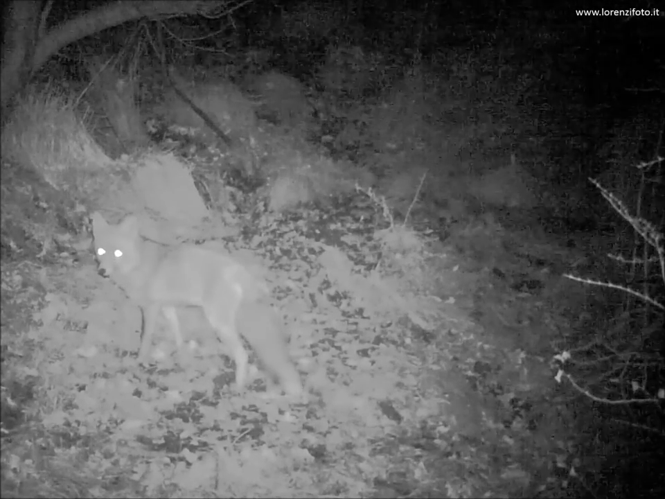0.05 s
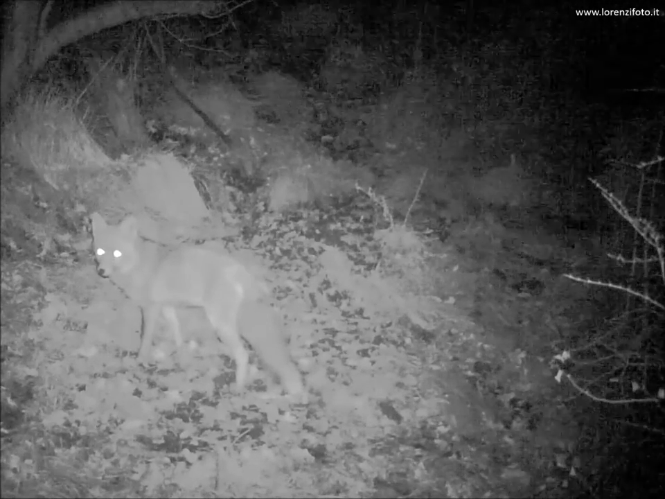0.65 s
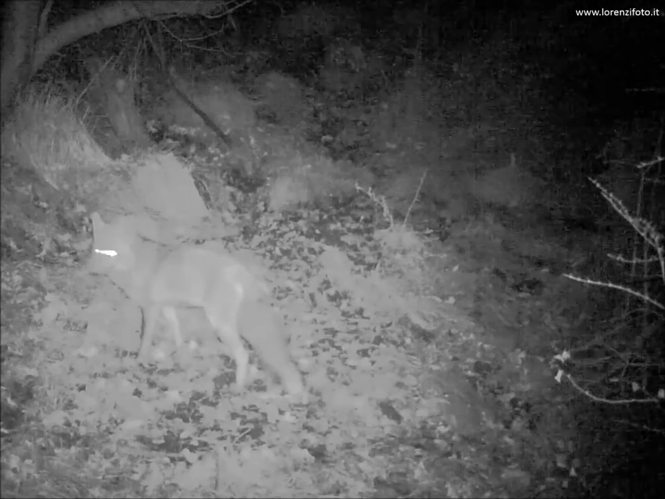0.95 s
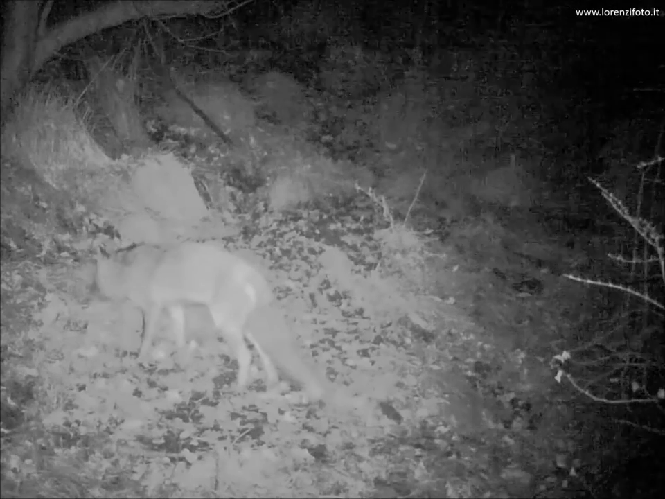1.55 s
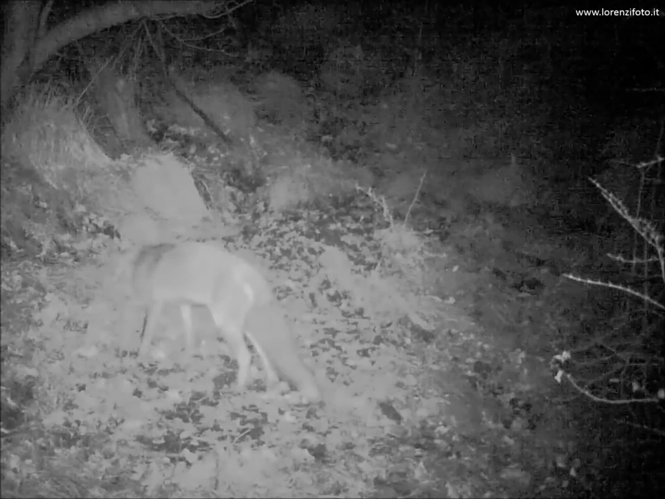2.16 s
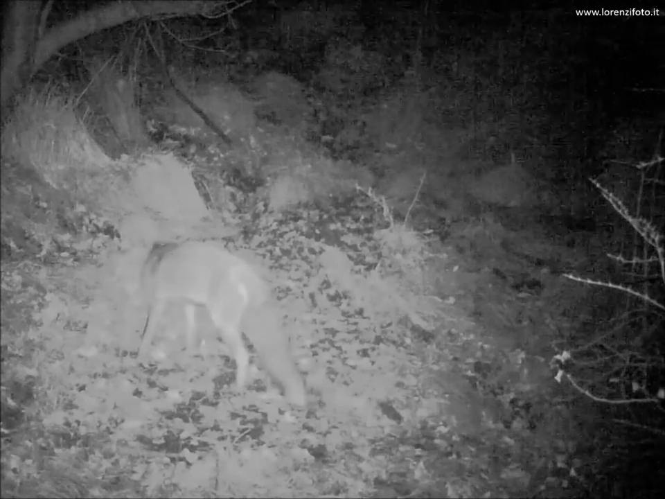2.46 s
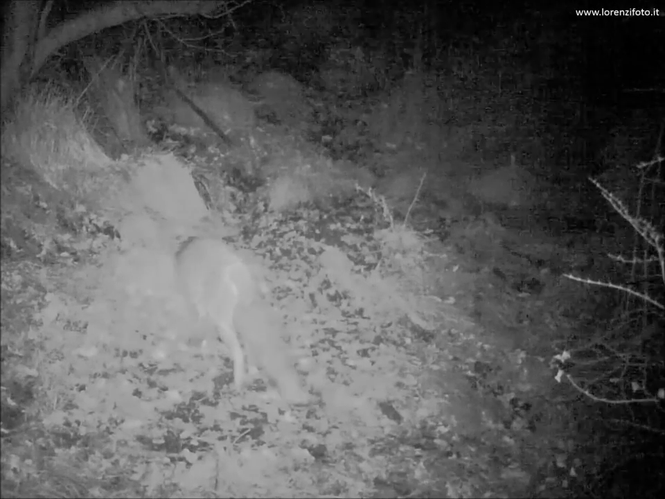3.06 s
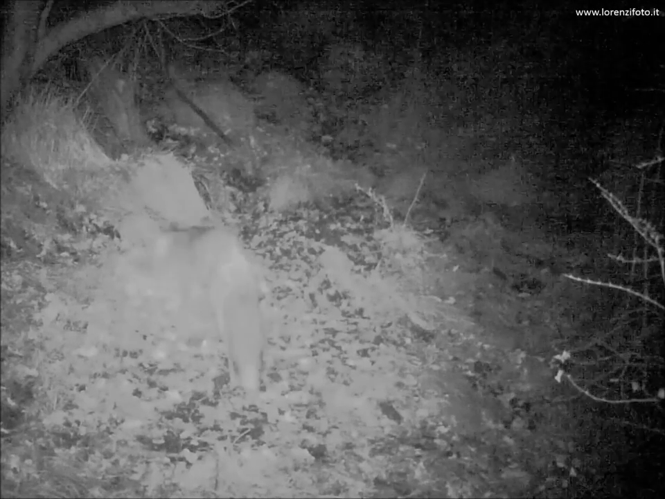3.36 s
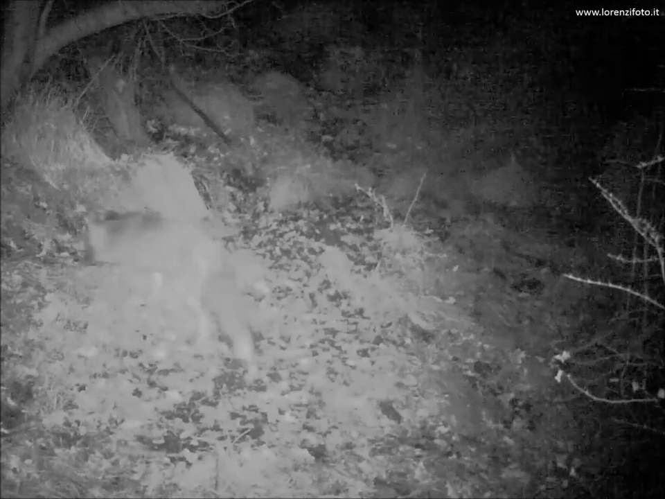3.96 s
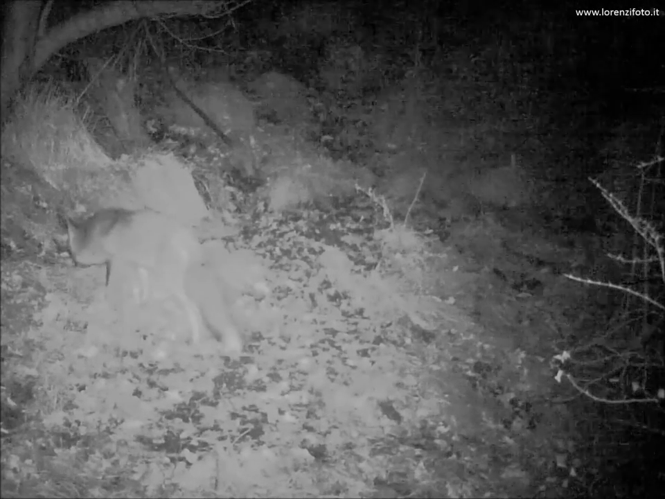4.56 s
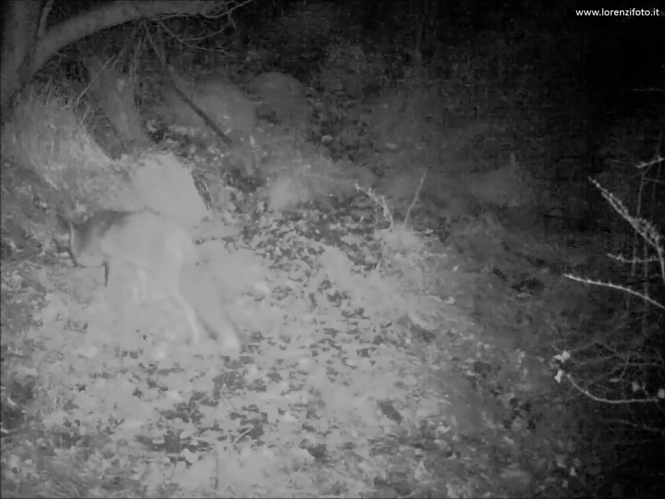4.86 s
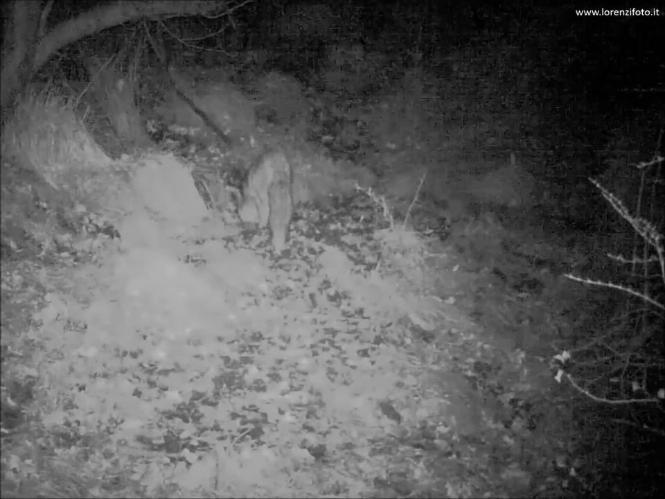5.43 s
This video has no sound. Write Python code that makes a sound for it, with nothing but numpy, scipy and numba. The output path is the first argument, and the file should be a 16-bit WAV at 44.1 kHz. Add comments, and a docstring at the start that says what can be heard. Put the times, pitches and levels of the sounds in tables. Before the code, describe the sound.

A steady, low microphone hiss fills a quiet wood at night. After about a second a fox barks once, a short, harsh call that starts thin and quickly turns rough and raspy. The trees return a soft, dull echo. A couple of seconds later a paw faintly stirs dry leaves, and the hiss carries on alone.

```python
"""A quiet wood at night, heard through one microphone that hisses steadily from start to end.
After about a second a fox barks once. Its voice starts as a thin, clean tone, breaks into rough,
uneven pulses as the mouth opens, then partly clears while squeezed air adds a faint whistle.
The trees return a soft echo. Near four seconds, a paw stirs the dry leaves."""
import sys
import numpy as np
from scipy import signal
from scipy.fft import rfft, irfft
from scipy.io import wavfile
from scipy.ndimage import uniform_filter1d
from numba import njit

SR = 44100
rng = np.random.default_rng(int(sys.argv[2]) if len(sys.argv) > 2 else 0)


def digitize_waveform(pressure):
    """Quantize a signal to 16-bit integers and store it at the path in sys.argv[1].

    Rows of a 2-D input are taken as channels; values are limited to [-1, 1].
    """
    field = np.atleast_2d(pressure).T
    bounded = np.clip(field, -1, 1)
    quanta = np.round(bounded * 32767).astype(np.int16)
    wavfile.write(sys.argv[1], SR, quanta)


N = 250929

# How strong the hiss is from bass to treble. Columns: pitch_hz, relative_level_db
HISS_SHAPE = [(20, -1.5), (50, 2.5), (160, 0), (350, -2.5), (800, -6.5), (2000, -10), (5000, -13.5),
              (9000, -15), (13500, -15.5), (15000, -18), (15700, -26)]
# Low pitches at which the throat rings; they barely move. Columns: pitch_hz, width_hz, relative_level_db
THROAT_RINGS = [(667, 110, -13), (836.4, 47, 8), (1076, 194, -1), (1174, 60, 9), (1281, 31, -13)]
# Higher rings, which rise as the mouth opens. Columns: pitch_hz, width_hz, relative_level_db
MOUTH_RINGS = [(1477, 265, 7), (2015, 100, 0), (2243, 132, 6.5), (2850, 340, -14.5), (3890, 510, -12),
               (5550, 450, -26), (7400, 450, -20.5)]

# One push of the lungs swells, holds, sags to a share of its force, and is shut off by the throat.
BARK_AT_S, SWELL_S, HOLD_S, SAG_S, SAG_TO, SHUT_S = 1.188, .145, .105, .08, .45, 0.022
# The voice starts clean, breaks, then clears a little (CLEAR_TO is the roughness left, out of 1).
CLEAN_S, BREAK_S, CLEAR_S, CLEAR_TO = 0.012, 0.031, 0.07, 0.82
# The jaw opens, then eases back. The first three numbers multiply the mouth's ringing pitches.
JAW_START, JAW_WIDE, JAW_END, JAW_OPENS_S = .92, 1.058, 0.95, 0.3
SLACK_HZ, EFFORT_HZ = 294, 50.03   # pulse rate at no effort, and what full effort adds
THROAT_DB, MOUTH_DB, MOUTH_POWER = -23.5, -38.5, 0.43   # levels at full effort; the mouth's exponent


def from_db(db):
    """Turn decibels into a number to multiply by."""
    return 10 ** (np.asarray(db) / 20)


def rms_one(x):
    """Scale a sound so its average strength (rms) is 1."""
    return x / np.sqrt(np.mean(x ** 2) + 1e-20)


def butter(x, hz, kind, order=2):
    """Keep the lows, the highs or a band; a higher order cuts more sharply."""
    return signal.sosfilt(signal.butter(order, hz, kind, fs=SR, output="sos"), x)


def drift(rate_hz):
    """A smooth random wobble with a typical size of 1."""
    return rms_one(butter(rng.standard_normal(N), rate_hz, "low"))


def steadied(x, samples):
    """Even out the loudness over a window of this many samples."""
    return x / np.sqrt(np.abs(uniform_filter1d(x ** 2, samples)) + 1e-12)


def envelope(start_s, rise_s, hold_s, fall_s, end=0):
    """Rise from 0 to 1, hold, then fall to the end value, all in straight lines."""
    corners_s = start_s + np.cumsum([0, rise_s, hold_s, fall_s])
    return np.interp(np.arange(N) / SR, corners_s, [0, 1, 1, end])


def hiss(level_db=-54):
    """The microphone's amplifier makes a steady noise, stronger towards the bass."""
    pitch_hz, shape_db = np.transpose(HISS_SHAPE)
    all_hz = np.maximum(np.fft.rfftfreq(N, 1 / SR), 1)
    gain = from_db(np.interp(np.log(all_hz), np.log(pitch_hz), shape_db))
    spectrum = rfft(rng.standard_normal(N)) * gain
    return from_db(level_db) * rms_one(irfft(spectrum, N))


def bark_movements():
    """How lung effort, airflow, roughness and jaw opening change during the bark."""
    t = np.arange(N) / SR - BARK_AT_S
    length_s = SWELL_S + HOLD_S + SAG_S + SHUT_S
    effort = envelope(BARK_AT_S, SWELL_S, HOLD_S, SAG_S, SAG_TO)
    airflow = np.clip((length_s - t) / SHUT_S, 0, 1)
    rough_s = length_s - CLEAN_S - BREAK_S - CLEAR_S
    roughness = envelope(BARK_AT_S + CLEAN_S, BREAK_S, rough_s, CLEAR_S, CLEAR_TO)
    # The jaw drops fast at first and slows as it nears its widest.
    drop = np.sin(np.pi / 2 * np.clip(t / JAW_OPENS_S, 0, 1))
    jaw_goal = np.interp(t, [JAW_OPENS_S, length_s], [JAW_WIDE, JAW_END])
    opening = JAW_START + drop * (jaw_goal - JAW_START)
    return effort, airflow, np.clip(roughness, 0, 1), opening


def vocal_folds(rate_hz, rate_wobble=.04, spread_db=2.0, limp=0.39, air=0.97, flutter=0.38):
    """The vocal folds close softly and unevenly, strong and weak in turn, in a stream of fluttering air."""
    cycles = np.cumsum(rate_hz * (1 + rate_wobble * drift(90))) / SR
    closings = np.flatnonzero(np.diff(np.floor(cycles)))
    strong_weak = 1 + limp * (-1) ** np.arange(len(closings))
    pulses = np.zeros(N)
    pulses[closings] = from_db(spread_db * rng.standard_normal(N)[closings]) * strong_weak
    puffs = rng.standard_normal(N) * (1 + flutter * np.cos(2 * np.pi * cycles))
    return butter(rms_one(pulses), 2240, "low", order=1) + air * rms_one(puffs)


@njit
def ring(x, angle, decay):
    """Ring at one moving pitch (angle, in radians per sample); a decay nearer 1 rings longer."""
    y = np.zeros(len(x))
    for i in range(2, len(x)):
        push = (1 - decay * decay) / 2 * (x[i] - x[i - 2])
        y[i] = push + 2 * decay * np.cos(angle[i]) * y[i - 1] - decay * decay * y[i - 2]
    return y


def airway(x, rings, pitch_factor):
    """The air in the throat or mouth rings at several pitches at once."""
    total = np.zeros(N)
    for k, (pitch_hz, width_hz, level_db) in enumerate(rings):
        angle = 2 * np.pi * pitch_hz * pitch_factor / SR
        decay = np.exp(-np.pi * width_hz * np.sqrt(2) / SR)
        ringing = ring(ring(x, angle, decay), angle, decay)   # twice, for a steeper peak
        total += (-1) ** k * from_db(level_db) * ringing   # every other one is flipped
    return total


def bark(waver=0.012, jaw_follow=0.21):
    """A clean tone breaks into rough pulses that ring the throat and mouth, then partly returns."""
    effort, airflow, roughness, opening = bark_movements()
    rate_hz = SLACK_HZ + EFFORT_HZ * effort
    pulses = vocal_folds(rate_hz)
    throat_shift = opening ** jaw_follow * (1 + waver * drift(11.4))
    throat = butter(airway(pulses, THROAT_RINGS, throat_shift), [520, 1420], "band", order=4)
    throat += from_db(-30.5) * butter(rng.standard_normal(N), [280, 650], "band")   # dull rush of air
    mouth = butter(airway(pulses, MOUTH_RINGS, opening), 1150, "high", order=4)
    tone = np.sqrt(2) * np.sin(2 * np.pi * np.cumsum(3 * rate_hz) / SR)
    # Steady lung pressure keeps the loudness even from pulse to pulse.
    voice = roughness * steadied(throat, samples=450) + np.sqrt(1 - roughness ** 2) * tone
    rasp = roughness * steadied(mouth, samples=450)
    throat_gain = from_db(THROAT_DB) * effort
    mouth_gain = from_db(MOUTH_DB) * effort ** MOUTH_POWER
    return airflow * (throat_gain * voice + mouth_gain * rasp)


def tree_echo(call, level_db=-43, fade_60_db_s=2.4, treble_cut_hz=4700):
    """Tree trunks scatter the call into a dull, fading echo one second long."""
    t = np.arange(SR) / SR
    echo = butter(rng.standard_normal(SR), treble_cut_hz, "low") * from_db(-60 * t / fade_60_db_s)
    return from_db(level_db) * signal.fftconvolve(call, echo / np.linalg.norm(echo))[:N]


def whistle(start_s=1.41, fade_s=.04, hold_s=.045, level_db=-56, flicker_db=3.5, waver=0.0122):
    """Late in the bark, air squeezed through the throat adds a high, unsteady, rising whistle."""
    age_s = np.clip(np.arange(N) / SR - start_s, 0, 2 * fade_s + hold_s)
    pitch_hz = 5620 + 2800 * age_s
    phase = 2 * np.pi * np.cumsum(pitch_hz * (1 + waver * drift(300))) / SR
    swell = envelope(start_s, fade_s, hold_s, fade_s)
    return from_db(level_db + flicker_db * drift(200)) * swell * np.sin(phase)


def paw_in_leaves(start_s=3.72, press_s=.03, lift_s=0.073, level_db=-60.5, flicker_db=2.0):
    """Dry leaves give way under a paw in a short burst of tiny crackles."""
    crackles = rng.standard_normal(N) * from_db(flicker_db * drift(300))
    rustle = steadied(butter(crackles, [3200, 4800], "band"), samples=1500)
    weight = envelope(start_s, press_s, 0, lift_s)
    return from_db(level_db) * weight * rustle


def scene():
    """Add up all the sounds; one microphone feeds both channels."""
    call = bark() + whistle()
    mix = call + tree_echo(call) + paw_in_leaves() + hiss()
    return np.tile(mix, (2, 1))


def record(dry, treble_cut_hz=15800, offset=.0053):
    """The highest treble is cut sharply, and the amplifier rests slightly off zero."""
    treble_cut = signal.firwin(401, treble_cut_hz, fs=SR)
    return offset + signal.fftconvolve(dry, treble_cut[None], mode="same")


dry = scene()
out = record(dry)
digitize_waveform(out)
```